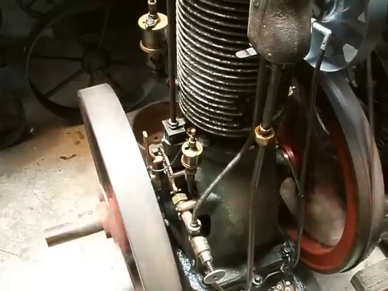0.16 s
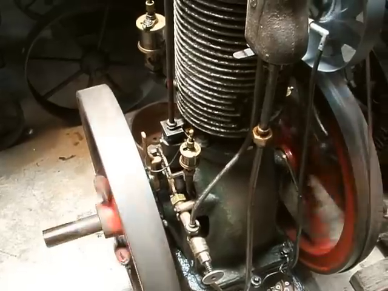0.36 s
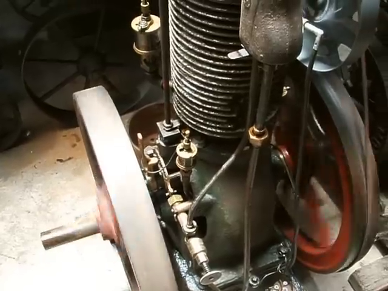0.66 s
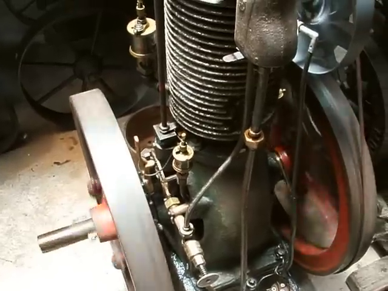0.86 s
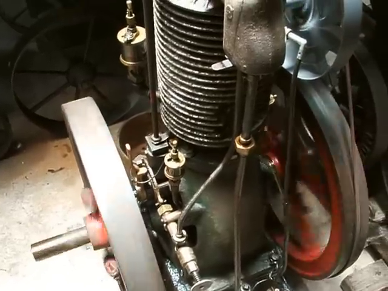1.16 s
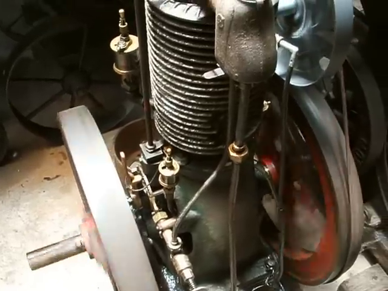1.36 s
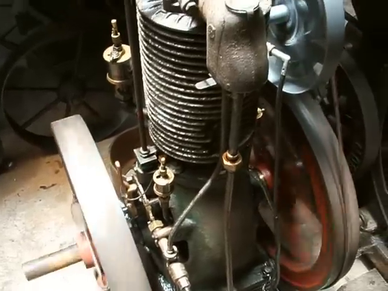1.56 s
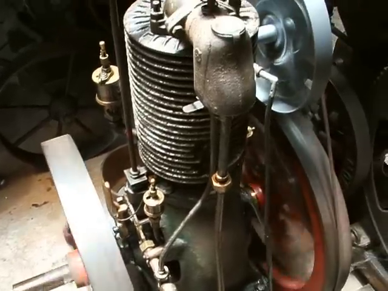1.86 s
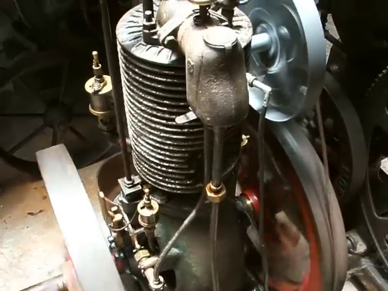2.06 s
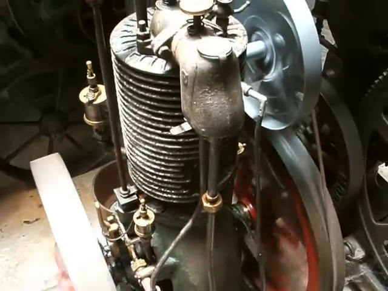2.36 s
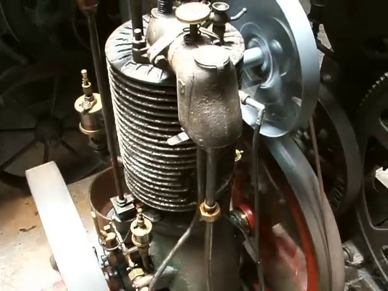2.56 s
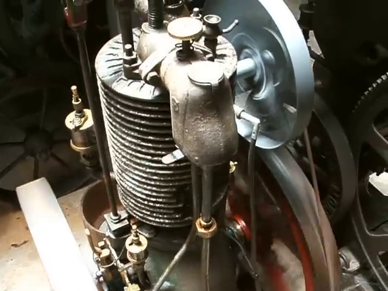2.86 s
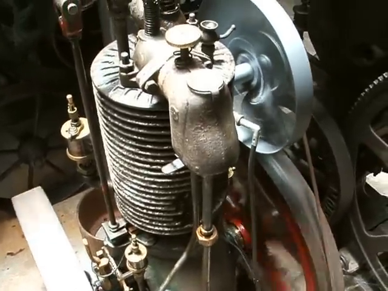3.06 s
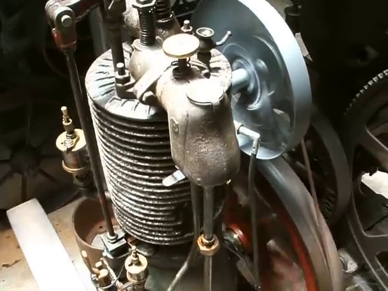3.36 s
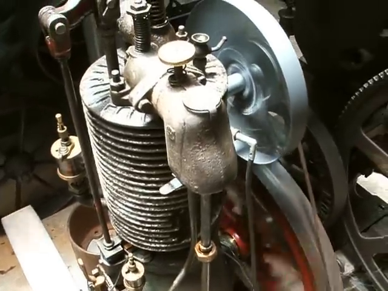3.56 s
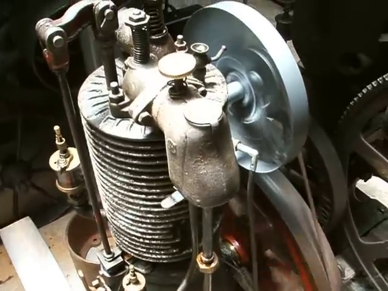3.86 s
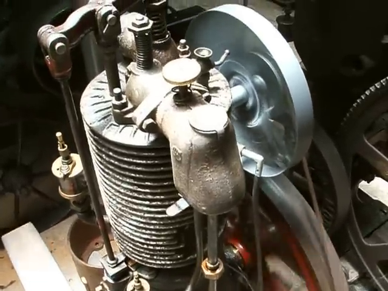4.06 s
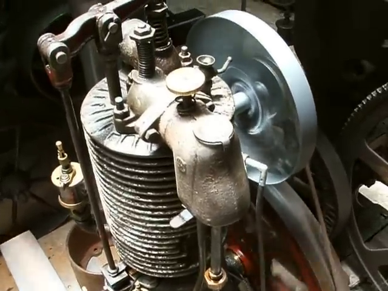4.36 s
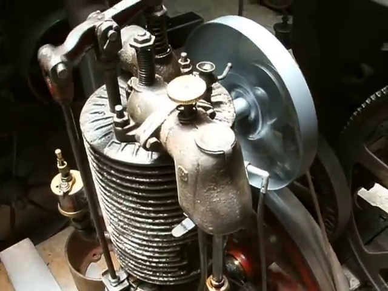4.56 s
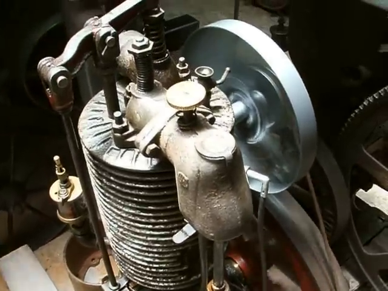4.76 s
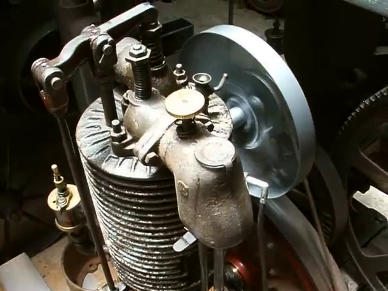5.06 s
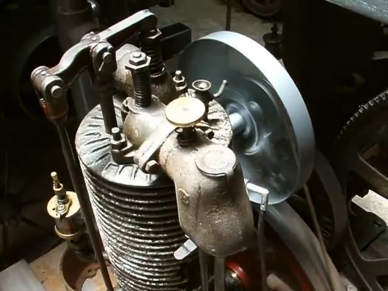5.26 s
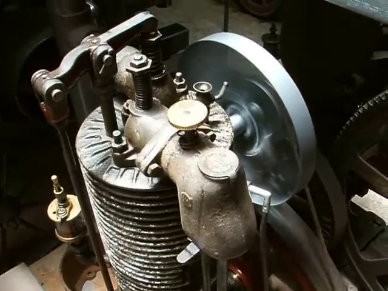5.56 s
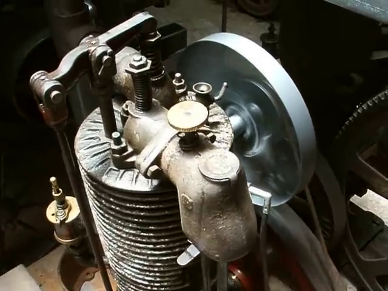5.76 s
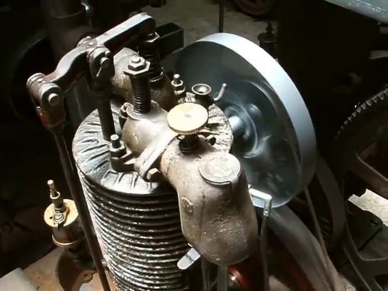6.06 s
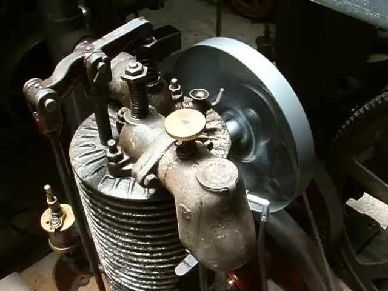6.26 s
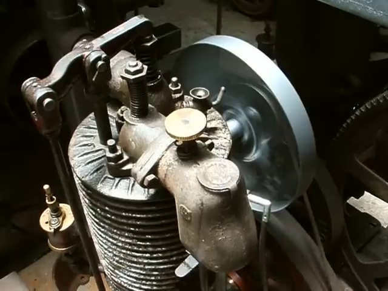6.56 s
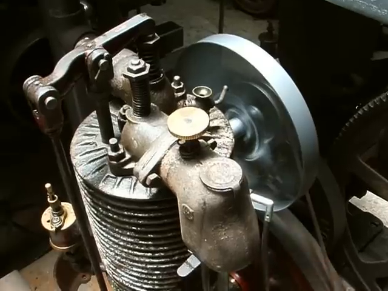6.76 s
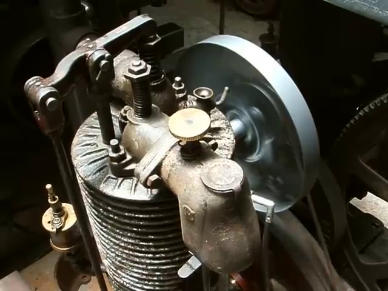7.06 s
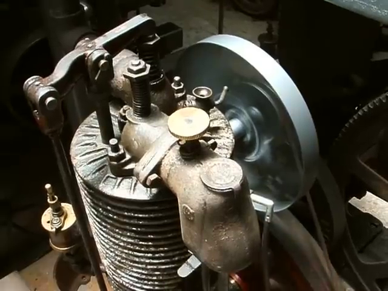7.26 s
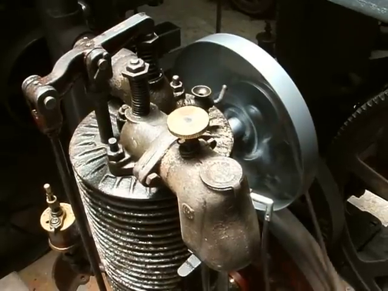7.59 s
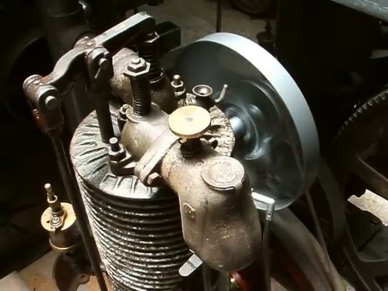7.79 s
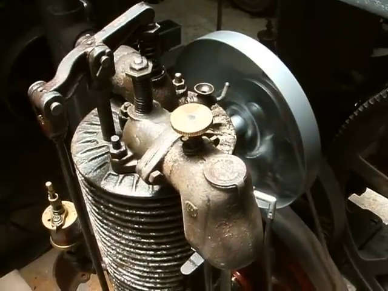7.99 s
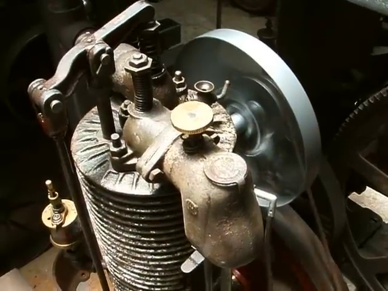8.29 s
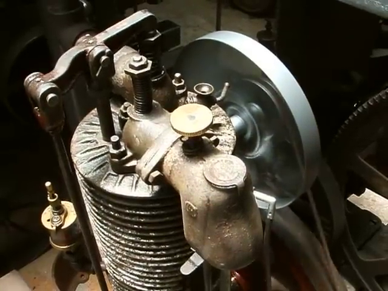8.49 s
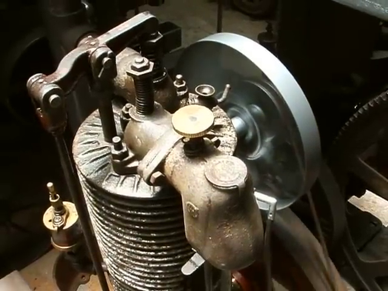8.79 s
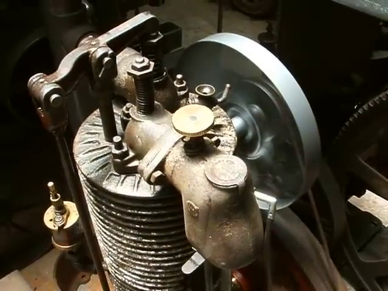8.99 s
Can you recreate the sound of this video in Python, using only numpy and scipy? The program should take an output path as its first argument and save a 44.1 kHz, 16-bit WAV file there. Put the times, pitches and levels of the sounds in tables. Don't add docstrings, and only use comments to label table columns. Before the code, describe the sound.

An old single-cylinder engine coasts in a shed, heard close through a coarse microphone with little deep bass. From 0 s a loud, gritty gear whirr pulses with each turn; a snappy latch tick and heavier rocker clack follow about every 0.49 s, ringing the iron, with faint rod clicks and thin high spring ringing. At 1.2 s the inlet valve chatters rapidly with a hollow air gulp, compression hisses, and at 1.6 s the exhaust cracks sharply with a short gas jet. The coasting sound drops to a grainy quiet, then gradually swells from about 2 to 4.5 s. A stronger chatter at 4.7 s leads to the hardest crack at 5.0 s. Quiet again, the tick-clacks rise until a double clack at 8.0 s, weaker intake at 8.1 s and last crack at 8.4 s. Subdued coasting and another tick-clack follow near 8.9 s. Shed walls add a short dull tail.

```python
import sys
import numpy as np
from scipy import signal
from scipy.fft import rfft, irfft, next_fast_len
from scipy.io import wavfile

SR = 44100
rng = np.random.default_rng(int(sys.argv[2]) if len(sys.argv) > 2 else 0)


def wrap_up_sound(samples):
    columns = np.atleast_2d(samples).T
    tamed = np.clip(columns, -1, 1)
    steps = np.round(tamed * 32767).astype(np.int16)
    wavfile.write(sys.argv[1], SR, steps)


def invert_db(x):
    u = np.asarray(x, float) / 20
    return 10 ** u


N = 402633
CAM_TURN_S = .49

# (time [s], level [dB], weight of its lows [dB], shake of the valve spring [dB])
LATCH_TICKS = [(0.027, 10, -1, -1), (0.536, 10, -5, -4), (1.069, 5.5, 0, -5), (2.056, 8, 0, -4),
               (2.519, 9, 0, 2), (2.993, 10, -1, 2), (3.484, 8, -3, -2), (3.99, 7.5, -1, 0),
               (4.513, 8, -3, 0), (5.481, 7, 1, -2), (5.938, 8, 2, -1), (6.407, 7, -1, 3),
               (6.897, 9, -1, -3), (7.39, 5, 3, 0), (7.908, 6, 2, 2), (8.862, 9, -1, -1)]
# (time [s], level [dB], weight of its lows [dB], shake of the valve spring [dB])
ROCKER_CLACKS = [(0.099, 11, 2, -2), (0.617, 9.5, -1, 0), (1.155, 8, 5.5, -10), (2.125, 6, 2, 3),
                 (2.589, 8, 1, 1), (3.067, 10.5, 1, 4), (3.561, 13.5, -3, -2), (4.068, 16, -8, -6),
                 (4.597, 13, 0, -6), (5.553, 11, -2, -2), (6.01, 10, 1, -3), (6.483, 11.5, 0, 2),
                 (6.968, 11, 0.5, 6), (7.469, 11.5, -1, -2), (7.987, 12, 0, 3), (8.935, 9, 0, 1)]
# (time after intake [s], level [dB], weight of its lows [dB], shake of the valve spring [dB])
VALVE_CHATTER = [
    (-.043, 3, -10, 8),
    (0, 15, -1, -10),
    (.034, 13.5, -3, -9),
    (.067, 14.5, -3, -8),
]
# (time [s], strength [dB], gain trim of the coasting run that follows [dB])
INTAKES = [
    (-2.23, 0, 3.6),
    (1.238, 0, -0.3),
    (4.678, 1.2, 0.8),
    (8.068, -2.5, -2),
]
# (frequency [Hz], density [dB per Hz])
WHIRR_SPECTRUM = [(35, -60), (66, -22.5), (321, -6), (431, -9.5), (478, -8.5), (565, -7), (975, -5),
                  (1200, -5.5), (3000, -8.7), (3800, -13.5), (6300, -9), (7940, -18), (9000, -45.5),
                  (11700, -95.5), (19800, -120)]


def rms_one(x):
    return x / np.sqrt(np.mean(x ** 2) + 1e-20)


def coloured(x, spectrum):
    hz, level_db = np.transpose(spectrum)
    size = next_fast_len(N, True)
    log_hz = np.log(np.arange(size // 2 + 1) * SR / size + 1)
    gain = invert_db(np.interp(log_hz, np.log(hz), level_db))
    return rms_one(irfft(rfft(x, size) * gain, size)[:N])


def band(x, which):
    # (lower edge [Hz], upper edge [Hz])
    edges_hz = [(170, 620), (620, 3600), (3600, 12000), (900, 3700), (180, 480)]
    return signal.sosfilt(signal.butter(3, edges_hz[which], "band", fs=SR, output="sos"), x)


def ring(x, hz, t60):
    r, w = invert_db(-60 / (t60 * SR)), 2 * np.pi * hz / SR
    return signal.lfilter([(1 - r * r) / 2, 0, (r * r - 1) / 2], [1, -2 * r * np.cos(w), r * r], x + 1e-18)


def modal_sum(force, modes):
    return sum(invert_db(db) * ring(force, hz, t60) for hz, db, t60 in modes)


def grit(spread_db):
    size_db = spread_db * np.minimum(rng.exponential(1, N), 4)
    return rms_one(rng.standard_normal(N) * invert_db(size_db))


def drift(rate_hz):
    knots = rng.standard_normal(N // 200 + 2)
    r = np.exp(-400 * np.pi * rate_hz / SR)
    slow = signal.lfilter([1], [1, -2 * r, r * r], knots)
    return np.interp(np.arange(N) / 200, np.arange(len(slow)), rms_one(slow))


def swell(seconds, level_db, rise_s, fall_s):
    t = np.arange(SR // 4) / SR
    shape = (1 - np.exp(-t / rise_s)) * np.exp(-t / fall_s)
    out = np.zeros(N + len(t))
    for s, db in zip(seconds, level_db):
        out[round(s * SR):][:len(t)] += invert_db(db) * shape / shape.max()
    return out[:N]


def after_intakes(pattern):
    return np.array([(at + s, db + strength_db, *rest)
                     for at, strength_db, _ in INTAKES[1:] for s, db, *rest in pattern])


def cam_clock():
    s = np.transpose(ROCKER_CLACKS)[0]
    s = np.r_[s[0] - CAM_TURN_S, s, s[-1] + CAM_TURN_S]
    return s, np.r_[0, np.cumsum(np.round(np.diff(s) / CAM_TURN_S))]


def coasting():
    s, turns = cam_clock()
    single = np.diff(turns)[1:] == 1
    return s[1:-1][single], np.diff(s)[1:][single]


def cycle():
    # (time after intake [s], gain [dB], air hiss [dB])
    recovery = [(-.1, -31, 0), (.035, -34, 12), (.11, -42, 13), (.16, -43, 8), (.22, -43, -1),
                (.29, -36, 8), (.42, -46.5, 9), (.52, -50, 5), (.62, -53.3, 5), (.72, -51, 3),
                (.9, -50, 3.5), (2.3, -37, 0), (2.9, -33, 0), (3.3, -31, 0)]
    s, gain_db, air_db = np.transpose(recovery)
    at, _, trim_db = np.transpose(INTAKES)
    t = np.arange(N) / SR
    since = t - at[np.searchsorted(at + s[0], t) - 1]
    gain_db = np.interp(since, s, gain_db) + np.interp(t, at + 2, trim_db)
    return gain_db, np.interp(since, s, air_db)


def cam_load():
    # (share of turn after the clack [0-1], whirr [dB], rumble [dB], hiss [dB])
    load = [(0, -.5, -5, -12), (.2, -.8, -6, -12.5), (.36, -2.3, -7.5, -14.5), (.45, -2.4, -7, -14),
            (.54, 1.9, -8, -12), (.78, -1.5, -9, -12), (.93, -.5, -4.5, -11)]
    share, *levels_db = np.transpose(load)
    angle = np.interp(np.arange(N) / SR, *cam_clock())
    return [np.interp(angle, share, db, period=1) for db in levels_db]


def shed(x):
    t60_s, cut_hz, level_db = 1, 2530, -15.5
    t = np.arange(SR // 2) / SR
    tail = rng.standard_normal(len(t)) * invert_db(-60 * t / t60_s) * (t > .004)
    tail = signal.sosfilt(signal.butter(1, cut_hz, fs=SR, output="sos"), tail)
    tail = tail / np.sqrt(np.sum(tail ** 2))
    return invert_db(level_db) * signal.fftconvolve(x, tail)[:N]


def iron(force, modes_db):
    # (frequency [Hz], level [dB], t60 [s])
    frame_modes = [(319, 1.5, .12), (366.4, 2.5, .12), (429.5, -2, 0.091), (579, -2, .09),
                   (919, -3.5, 0.18), (1159, 1, 0.11), (1264.6, -2.5, .06), (1469, -6.5, 0.074),
                   (1650, -8, .06), (1818, -1.5, .04), (2050, 0, .06), (2243, -1, .06), (2412, -6.5, .06),
                   (2690, -5, 0.087), (2896, 2.5, .15), (3135, -4.5, 0.15), (3897, -7.5, 0.16),
                   (4780, -6.5, 0.064), (5170, -6, .06), (6000, -8, 0.066), (7760, -9.5, 0.049)]
    return force + invert_db(modes_db) * modal_sum(force, frame_modes)


def running(whirr_db, rumble_db, hiss_db):
    teeth = coloured(iron(grit(1.68), modes_db=2.0), WHIRR_SPECTRUM)
    rumble = signal.sosfilt(signal.butter(3, 620, fs=SR, output="sos"), teeth)
    parts = [rumble, band(teeth, 1), band(teeth, 2)]
    levels_db = [rumble_db, whirr_db, hiss_db]
    flicker_db = 1.1
    return sum(rms_one(part) * invert_db(db + flicker_db * drift(20)) for part, db in zip(parts, levels_db))


def push_rod():
    back = coasting()[0] + .126
    take_up = np.transpose(LATCH_TICKS)[0][1:] - .053
    click_db = np.r_[0 * back - 1.5, 0 * take_up - 4.5]
    return band(grit(2.5), 2) * swell(np.r_[back, take_up], click_db, 0.00073, 0.018)


def spring():
    hum_db, rub_share, rub_db = -9, .54, -12
    shake = invert_db(hum_db)
    # (blows, lag [s], fall [s], trim [dB])
    shakers = [(LATCH_TICKS, .008, .006, 20.3), (ROCKER_CLACKS, .007, .007, 19.8),
               (after_intakes(VALVE_CHATTER), .004, .007, 22)]
    for table, lag_s, fall_s, trim_db in shakers:
        s, level_db, _, spring_db = np.transpose(table)
        shake = shake + swell(s + lag_s, level_db + spring_db + trim_db, 0.0012, fall_s)
    start, length = coasting()
    s = (start + rub_share * length)[:-1]
    force = (shake + swell(s, 0 * s + rub_db + 20, 0.01, 0.02)) * grit(1.2)
    return ring(force, 6372, 0.065) + invert_db(-1.1) * ring(force, 6230, 0.032)


def leaks():
    # (time after intake [s], low [dB], middle [dB], hiss [dB])
    leak = [
        (.24, 2.5, -5, 0),
    ]
    s = after_intakes(leak)[:, 0]
    gas = coloured(grit(4.5), WHIRR_SPECTRUM)
    parts = [band(gas, 0), band(gas, 1), band(grit(3.0), 2)]
    return sum(rms_one(part) * swell(s, 0 * s + db, 0.0052, 0.029) for part, db in zip(parts, leak[0][1:]))


def gulps():
    # (time after intake [s], level [dB])
    puff_pattern = [
        (-.03, 15),
        (0, 18),
        (.034, 18.5),
        (.065, 17.5),
        (.24, 13),
    ]
    s, peak_db = np.transpose(after_intakes(puff_pattern))
    puffs = np.zeros(N)
    puffs[((s + .0015) * SR).astype(int)] = invert_db(peak_db + 37)
    horn = ring(ring(puffs, 310, .009), 345, .014)
    air = ring(ring(rng.standard_normal(N), 60, 0.022), 130, 0.013)
    draw = air * swell(s[::len(puff_pattern)], [26, 24.5, 17.5], .03, 0.045)
    return horn + draw


def blows(table, contacts, lag_s, rise_s, fall_s, trim_db):
    s, level_db, weight_db = np.transpose(table)[:3]
    parts_db = [level_db + weight_db, level_db + weight_db, level_db]
    return sum(part * swell(s + lag_s[k], parts_db[k] + trim_db[k], rise_s[k], fall_s[k])
               for k, part in enumerate(contacts))


def inlet_valve(contacts):
    return blows(after_intakes(VALVE_CHATTER), contacts,
                 [.002, .0005, 0], [.002, .0006, .0003], [.006, .005, .006], [-11.0, -1.2, 3.0])


def valve_head(force):
    # (frequency [Hz], level [dB], t60 [s])
    head_modes = [(4910, -9.5, 0.034), (4890, -8.5, 0.011), (7210, -8, 0.017), (7680, 0, 0.099)]
    return invert_db(13.0) * modal_sum(force, head_modes)


def latch(contacts):
    release = blows(LATCH_TICKS, contacts,
                    [.006, .0005, 0], [.004, .0006, .0003], [.025, .005, .003], [3.5, 6.0, 5.2])
    stop = blows(LATCH_TICKS, contacts,
                 [.012, .009, .008], [.004, .0015, .0006], [.02, .01, .006], [0.5, 1.2, 0.4])
    return release + stop


def rocker(contacts):
    # (time [s], level [dB], weight of its lows [dB])
    second_landing = [
        (8.007, 19, -3),
    ]
    landing = blows(ROCKER_CLACKS, contacts,
                    [.006, .004, 0], [.004, .003, .0008], [.015, .013, .012], [-2.5, 8.8, 2.2])
    again = blows(second_landing, contacts,
                  [.003, .0012, 0], [.002, .0008, .0003], [.01, .008, .003], [-5.0, 8.0, 1.5])
    bounce = blows(ROCKER_CLACKS, contacts,
                   [.036, .035, .035], [.005, .004, .003], [.04, .03, .015], [-3.5, -1.5, -12.0])
    return landing + again + bounce


def firing():
    # (time [s], pressure pulse [dB], jet [dB])
    exhausts = [
        (1.5803, 26.5, 7),
        (5.0133, 28, 8.5),
        (8.3986, 27, 7.5),
    ]
    # (frequency [Hz], density [dB per Hz])
    jet_spectrum = [(710, 13), (1200, -23.5), (1810, -1), (2480, 1.5), (4320, 1.5), (7540, -8),
                    (8410, -3.5), (9000, -37.5), (11700, -76), (19800, -120)]
    s, pulse_db, jet_db = np.transpose(exhausts)
    t = np.arange(-80, 300) / SR
    width_s = np.where(t < 0, .00033, .00036)
    n_wave = -t / 0.00026 * np.exp(-.5 * (t / width_s) ** 2)
    pulse = np.zeros(N)
    for at, db in zip(s, pulse_db):
        pulse[round(at * SR) - 76:][:len(t)] += invert_db(db - 3.5) * n_wave
    gas = coloured(grit(1.4), jet_spectrum)
    whistle = invert_db(22.0) * ring(gas, 6800, 0.0019)
    jet = (gas + whistle) * swell(s - .0012, jet_db + 7.5, 0.00096, .011)
    slap = ring(grit(2.1), 1700, 0.0026) * swell(s + .011, jet_db + 18.5, 0.003, 0.008)
    pipe = invert_db(5.5) * ring(pulse, 190, 0.013) + invert_db(2.5) * ring(pulse, 520, 0.01)
    return pulse + pipe, jet + slap


def scene():
    blow_bands = [4, 3, 2]
    whirr_db, rumble_db, hiss_db = cam_load()
    contacts = [band(grit(2.5), which) for which in blow_bands]
    valve = inlet_valve(contacts)
    struck = iron(latch(contacts) + rocker(contacts) + valve, modes_db=6.5) + valve_head(valve)
    pulse, jet = firing()
    hits = struck + jet + gulps() + spring() + push_rod() + leaks()
    walls = shed(hits + invert_db(-15.0) * pulse)
    air_db = cycle()[1]
    return (running(whirr_db, rumble_db, hiss_db + air_db) + hits + pulse + walls)[None]


def low_pass(x):
    return signal.sosfilt(signal.butter(12, 9610, fs=SR, output="sos"), x)


def record(dry):
    step = .0055
    x = dry * invert_db(cycle()[0])
    x = signal.sosfilt(signal.butter(2, 80, "high", fs=SR, output="sos"), x)
    x = signal.resample_poly(x, 160, 441, axis=1, window=signal.firwin(8821, 1.12 / 441))
    x = (np.round(x / step) + 1) * step
    playback = signal.firwin(14113, 1 / 441, window=("kaiser", 9.0))
    x = signal.resample_poly(x, 441, 160, axis=1, window=playback, padtype="mean")[:, :N]
    return low_pass(x)


dry = scene()
out = record(dry)
wrap_up_sound(out)
```